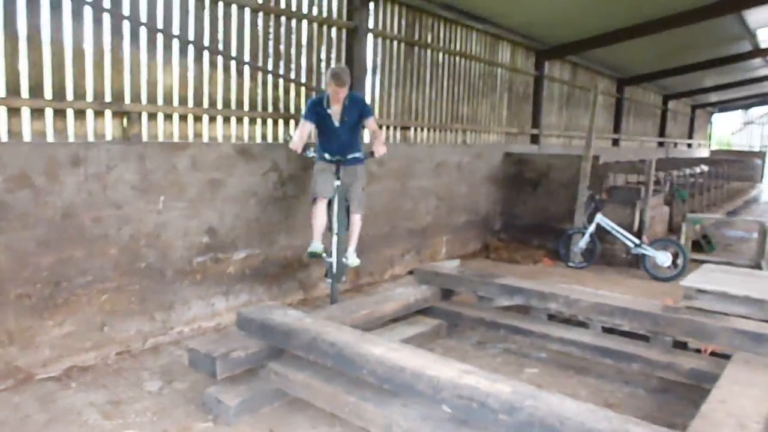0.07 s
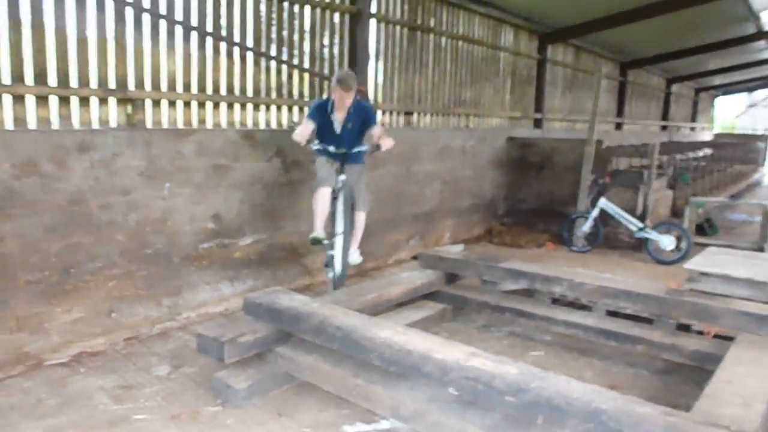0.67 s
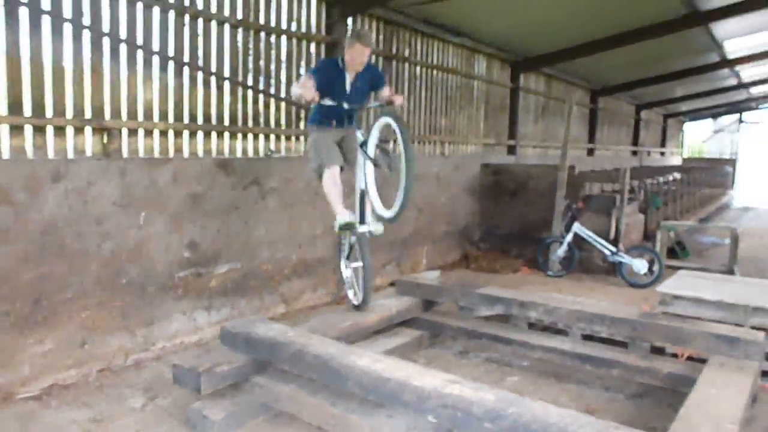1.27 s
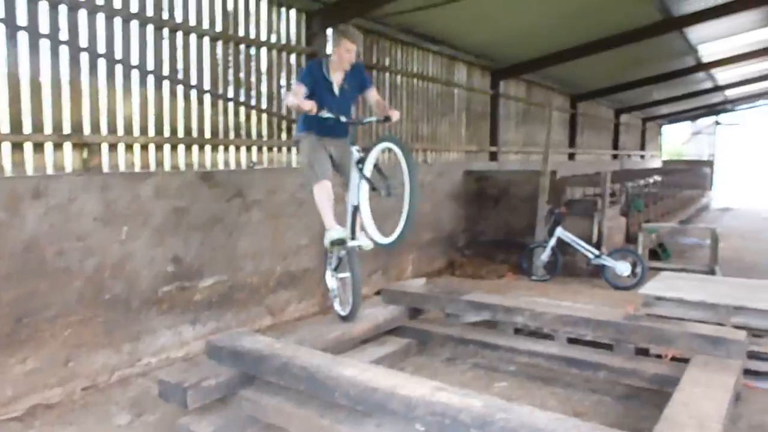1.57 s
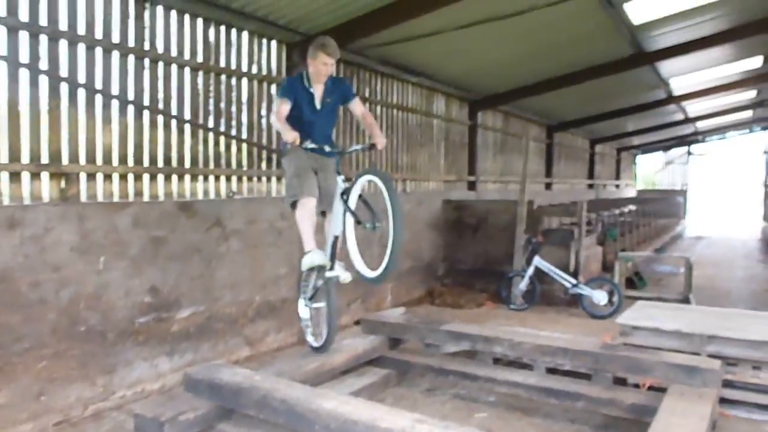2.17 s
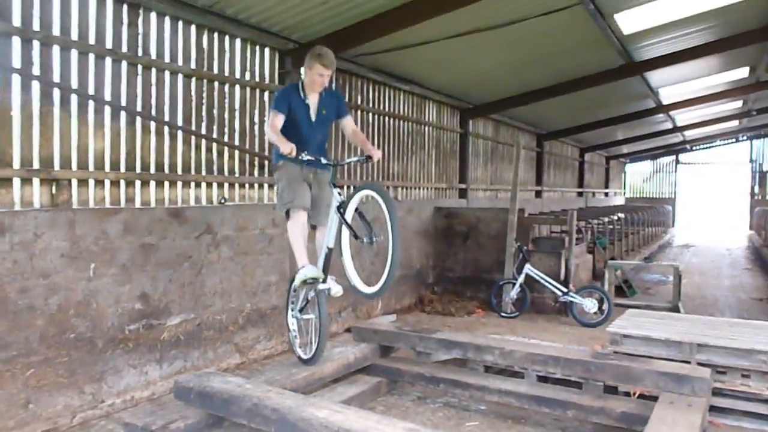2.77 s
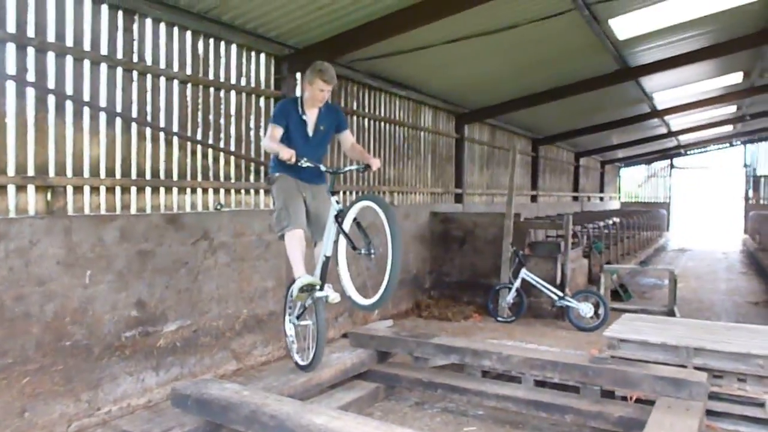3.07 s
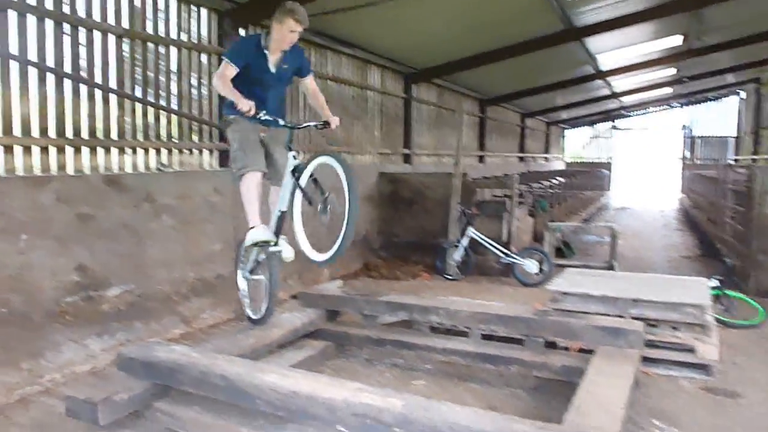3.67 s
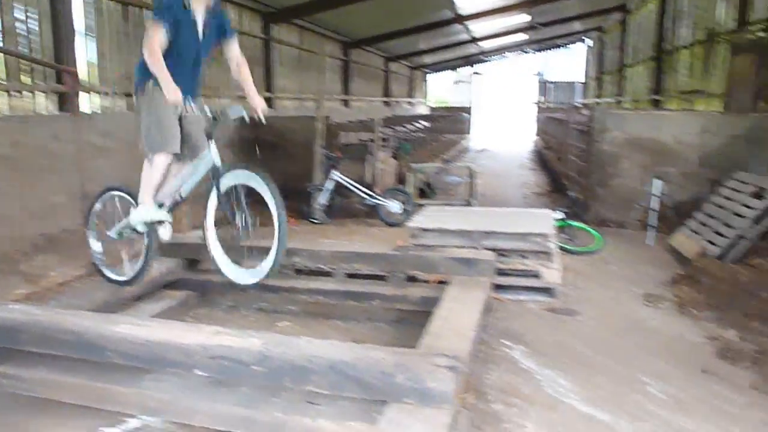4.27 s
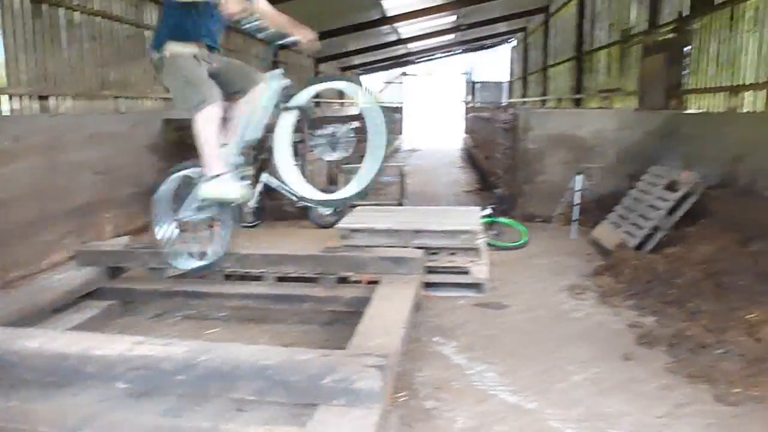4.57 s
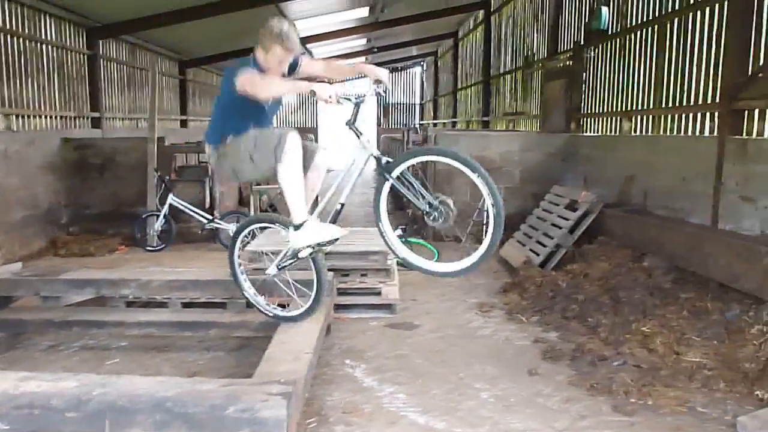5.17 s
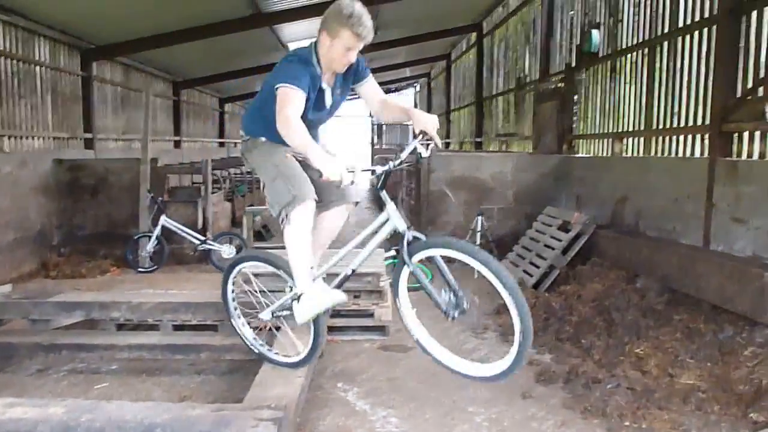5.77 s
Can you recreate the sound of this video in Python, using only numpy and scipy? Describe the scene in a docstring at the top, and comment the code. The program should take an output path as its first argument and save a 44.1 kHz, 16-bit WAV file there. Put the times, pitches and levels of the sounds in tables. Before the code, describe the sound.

A bicycle hops on wooden beams in a large, echoing barn, over a faint steady hush. From about 0.2 to 0.4 seconds the brakes give a loud, stuttering honk that leaves the wheel ringing. The freewheel buzzes briefly, then a second honk with a chain clink comes near 0.9 seconds, followed by another buzz and a sharp, higher squeak at 1.2. From 1.7 to 3.8 seconds it is quieter, with soft, irregular tyre thumps on timber as the ring fades. The chain clinks at 4 seconds, and around 4.5 the freewheel buzzes with tyre scrub and a short low hum. The loudest sound, a very short brake squawk, hits at 4.7 seconds and rings on. At about 5.3 the bike lands with a firm knock, a chain snap and another squeak, then the tyres scrub faintly.

```python
"""A trials bike's brakes honk as it hops along wooden beams in a big barn.
The pads stick and slip, sounding through the frame and setting the wheel ringing.
Between grabs the freewheel buzzes, the chain clinks, and tyres scrub, thump and hum on the timber.
The barn rings on over a steady hush; a limiter ducks the loudest peaks."""
import sys
import numpy as np
from scipy import signal
from scipy.fft import rfft, irfft, next_fast_len
from scipy.io import wavfile
from scipy.ndimage import uniform_filter1d, minimum_filter1d

SR = 44100
rng = np.random.default_rng(int(sys.argv[2]) if len(sys.argv) > 2 else 0)


def persist_wave(psi):
    """Save psi, clipped to +-1, as 16-bit WAV."""
    counts = np.round(np.clip(psi, -1, 1) * 32767).astype(np.int16)
    wavfile.write(sys.argv[1], SR, np.atleast_2d(counts).T)


N = 261513
BAND_EDGE_HZ = 7950


def amp(db):
    """Decibels to gain."""
    return 10 ** (np.asarray(db) / 20)


def unit_rms(x):
    """Scale to rms 1."""
    return x / np.sqrt(np.mean(x ** 2) + 1e-20)


def lookup(curve, hz):
    """Interpolate a table on a log-frequency axis."""
    points_hz, values = np.transpose(curve)
    return np.interp(np.log(hz + 1), np.log(points_hz), values)


def colour(x, curve, tilt_db_per_oct=0):
    """Filter by a gain curve tilted about 1 kHz; cut off just past the band edge."""
    size = next_fast_len(x.shape[-1] + 2048)
    hz = np.fft.rfftfreq(size, 1 / SR)
    octaves = np.log2(np.maximum(hz, 200) / 1000)
    gain = amp(lookup(curve, hz) + tilt_db_per_oct * octaves) * (hz < BAND_EDGE_HZ + 600)
    return irfft(rfft(x, size) * gain, size)[..., :x.shape[-1]]


def wander(shape, span_samples):
    """Smooth random drift, rms 1."""
    drift = uniform_filter1d(rng.standard_normal(shape), span_samples)
    return unit_rms(uniform_filter1d(drift, span_samples))


def grit(samples, spread_db):
    """Dense tiny contacts of uneven size."""
    return unit_rms(rng.standard_normal(samples) * amp(spread_db * wander(samples, span_samples=24)))


def stroke(hold_s, swell_db, attack_s, release_s):
    """Attack, sloping hold, release: returns time, progress 0-1 and gain."""
    t = np.arange(0, hold_s + 7 * release_s, 1 / SR)
    progress = np.minimum(t / hold_s, 1)
    edges = np.minimum(t / attack_s, 1) * np.exp(-np.maximum(t - hold_s, 0) / release_s)
    return t, progress, edges * amp(swell_db * (progress - 0.5))


# Hub response: freq_hz, gain_db
HUB_BODY = [(100, -47.5), (600, -28), (1500, -6.5), (2200, -12.5), (3300, -3), (4200, 0.5), (5200, 4),
            (6400, 0), (7300, -2.5), (8200, -34.5)]
# Spells of rolling: start_s, hold_s, freewheel_db, scrub_db, swell_db
WHEEL_ROLLS = [ (0, 0.089, -46.5, -44, -7), (.51, .21, -41.5, -43, 0), (0.996, .218, -38, -44.5, 10.5),
               (1.841, 0.1, -51, -59, -19), (2.401, 0.034, -46, -59, 8), (3.811, 0.16, -39, -47, 2),
               (4.019, 0.026, -38, -40.5, -11), (4.274, 0.11, -64, -46.5, 15), (4.40, 0.083, -34, -40, 3),
               (4.482, 0.3, -31.5, -34, 0.5), (5.004, 0.062, -41, -41.5, 1.5), (5.227, 0.14, -45, -64, 11),
               (5.663, 0.4, -59.5, -47, 8.5)]


def freewheel(clicks_per_s=330, ring_s=0.008, uneven_db=3):
    """Pawls drop over ratchet teeth so fast that the clicks blur into a buzz."""
    out = np.zeros(N)
    for start_s, hold_s, level_db, _, swell_db in WHEEL_ROLLS:
        t, _, gain = stroke(hold_s, swell_db, attack_s=0.0039, release_s=0.012)
        teeth = np.cumsum(clicks_per_s * (1 + 0.16 * wander(len(t), span_samples=1500))) / SR
        tooth_force = amp(uneven_db * rng.standard_normal(2048))[teeth.astype(int) % 2048]
        since_click_s = (teeth % 1) / clicks_per_s
        clicks = tooth_force * np.exp(-since_click_s / ring_s) * rng.standard_normal(len(t))
        add(out, start_s, amp(level_db) * gain * unit_rms(colour(clicks, HUB_BODY)))
    return out


# Beam response: freq_hz, gain_db
TIMBER_BODY = [(60, -27), (130, -14.5), (250, -2.5), (400, 8), (700, 6.5), (1100, -2), (1700, -3),
               (2700, -6.5), (3600, -13.5), (6000, -18.5), (8000, -35.5)]


def tyre_scrub():
    """Rubber scrubs the wood as the wheels turn."""
    out = np.zeros(N)
    for start_s, hold_s, _, level_db, swell_db in WHEEL_ROLLS:
        t, _, gain = stroke(hold_s, swell_db, attack_s=0.0063, release_s=0.073)
        scrub = colour(grit(len(t), spread_db=4), TIMBER_BODY, tilt_db_per_oct=4)
        add(out, start_s, amp(level_db) * gain * unit_rms(scrub))
    return out


# Diffuse-field width: freq_hz, side_gain_db
STEREO_WIDTH = [(40, 4), (120, -10), (250, -12), (500, -10), (1000, -8.5), (2000, -5), (4000, 0.5),
                (8000, -2.5)]


def diffuse(mid, side):
    """Sound from all round: left and right alike in the low mids, unrelated in the treble."""
    side = colour(side, STEREO_WIDTH)
    return np.array([mid + side, mid - side])


# Background spectrum: freq_hz, gain_db
AIR_SPECTRUM = [(18, -58.5), (30, -40), (76, -63), (158, -11), (209, -15), (283, -4.5), (402, -14),
                (451, -6), (1050, -12.5), (1350, -11), (1520, -16.5), (5630, -25), (8000, -38.5),
                (10400, -74.5), (17600, -120)]


def air(level_db=-52):
    """Steady hush of the open barn."""
    mid, side = colour(rng.standard_normal((2, N)), AIR_SPECTRUM)
    drift_db = 0.5 * wander(N, span_samples=3000)
    return amp(level_db + drift_db) * diffuse(unit_rms(mid), unit_rms(side))


def impact(level_db, decay_s, body, rise_s, tilt_db_per_oct=0):
    """A flurry of contacts swells and dies, coloured by the struck body."""
    t = np.arange(SR // 3) / SR
    contacts = grit(len(t), spread_db=2.5)
    steady_rms = np.sqrt(np.mean(colour(contacts, body, tilt_db_per_oct) ** 2))
    force = np.exp(-t / decay_s) * (1 - np.exp(-t / rise_s))
    return amp(level_db) / steady_rms * colour(contacts * force, body, tilt_db_per_oct)


# Chain response: freq_hz, gain_db
CHAIN_BODY = [(500, -50.5), (1100, 6.5), (1700, 9), (2300, 2.5), (3200, 3.5), (4500, 3), (6000, 8),
              (8000, -9)]
# Drive taking up load: start_s, level_db, decay_s
CHAIN_CLINKS = [(0.028, -36, 0.0031), (0.175, -39.5, 0.029), (0.881, -25, 0.017), (1.805, -35.5, 0.018),
                (2.404, -60, 0.0028), (3.812, -34, 0.0086), (4.004, -24.5, 0.015), (5.235, -37, 0.0066),
                (5.264, -41, 0.0053), (5.311, -40.5, .004), (5.34, -22, 0.0047)]


def chain_clinks():
    """Pawls and chain snap tight."""
    out = np.zeros(N)
    for start_s, level_db, decay_s in CHAIN_CLINKS:
        add(out, start_s, impact(level_db, decay_s, CHAIN_BODY, rise_s=0.0006))
    return out


def stick_slip(pitch_hz, roughness, tilt_db_per_oct, body, jitter, rasp, smear):
    """A train of slips as harmonics through a body; rough slips come unevenly and rasp."""
    slip_hz = pitch_hz * (1 + jitter * roughness * wander(len(pitch_hz), span_samples=70))
    phase = 2 * np.pi * np.cumsum(slip_hz) / SR
    harmonic = np.arange(1, 15)[:, None]
    gains = amp(lookup(body, harmonic * pitch_hz) + tilt_db_per_oct * np.log2(harmonic))
    gains /= np.sqrt((gains ** 2).sum(0) / 2)
    # Slip edges vary, so upper harmonics dissolve into hiss.
    blur_rad = smear * roughness * (harmonic - 1) * wander(gains.shape, span_samples=36)
    offset_rad = rng.uniform(0, 2 * np.pi, harmonic.shape)
    tone = (gains * np.cos(harmonic * phase + blur_rad + offset_rad)).sum(0)
    pulsed_noise = rng.standard_normal(len(phase)) * (1 + np.cos(phase))
    return tone + rasp * roughness * unit_rms(colour(pulsed_noise, body))


# Frame and rim radiation: freq_hz, gain_db
FRAME_BODY = [(100, -42.5), (380, -24.5), (500, 10), (900, -2), (1100, -3), (1500, 6.5), (1850, -6.5),
              (2100, -2.5), (2400, -3), (2750, -8.5), (3400, -12.5), (4500, -18), (6200, -17.5),
              (8000, -42.5)]


def squeal(hold_s, opening_hz, settled_hz, level_db, swell_db, roughness, tilt_db_per_oct):
    """A pad catches, slides onto its note, and grows cleaner and brighter as it bites."""
    attack_s, release_s = 0.0021 + 0.15 * hold_s, 0.003 + 0.1 * hold_s
    settle_s, lock_share, bite_db_per_oct = 0.0079, 0.37, 4.5
    t, progress, gain = stroke(hold_s, swell_db, attack_s, release_s)
    pitch_hz = settled_hz + (opening_hz - settled_hz) * np.exp(-t / settle_s)
    bite = progress ** 4.24
    roughness = roughness * (1 - lock_share * bite)  # slips lock into step
    tilt_db_per_oct = tilt_db_per_oct + bite_db_per_oct * bite
    slips = stick_slip(pitch_hz, roughness, tilt_db_per_oct, FRAME_BODY, jitter=0.17, rasp=0.9, smear=1.9)
    return amp(level_db) * gain * slips


# Pad catches: start_s, hold_s, opening_hz, settled_hz, level_db, swell_db, roughness, tilt_db_per_oct
BRAKE_GRABS = [ (0.215, 0.053, 536.6, 516.7, -15.5, 5.5, 0.16, -8.5),
               (.266, 0.015, 518, 529.3, -24.5, -5, 0.07, 0.5),
               (.297, 0.038, 537.6, 536.4, -25, -7.5, .08, -2),
               (0.341, 0.053, 519.5, 520.1, -20, -3.5, 0.08, -3.5),
               (.825, 0.044, 521.3, 513, -24.5, -5, 0.3, -1.5),
               (.829, 0.046, 749, 723.5, -26.5, -2.5, .3, -14),
               (.877, .012, 725.5, 730, -16.5, -2.5, 0.17, -6),
               (.896, 0.0035, 655, 706, -13, 1, 0.39, -4.5), (.903, .03, 727.6, 726, -29.5, 4, 0.2, 5.5),
               (1.2205, .02, 799.4, 987, -7.5, -12.5, 0.19, -0.5),
               (4.687, .014, 570.5, 544.2, -7, -1, .5, 1), (4.687, .008, 1067, 1308, -3.5, -2, 0.49, -4.5),
               (4.696, .009, 906.7, 955, -0.5, 2, 0.31, -1),
               (5.346, 0.0064, 600, 555, -18.5, 3, 0.19, -0.5),
               (5.347, 0.0041, 1179, 1030, -13.5, -6, 0.21, -9),
               (5.362, .045, 553, 532.3, -25.5, -4, 0.54, 4),
               (5.69, 0.12, 522, 509.4, -44.5, -10, 0.4, -29)]
# Braked wheel modes: freq_hz, gain_db, t60_s
WHEEL_MODES = [(545.6, 8, 2.2), (666, 7.5, 4), (1204, -2.5, 0.11), (1487, -3.5, 0.04), (1690, -4, 0.033),
               (1855, -9, 1.2)]


def brakes(low_cut_hz=360):
    """Pads honk through the frame; the wheel rings on."""
    honk = np.zeros(N)
    for start_s, *grab in BRAKE_GRABS:
        add(honk, start_s, squeal(*grab))
    # Thin tubes and rims radiate no bass.
    honk = signal.sosfilt(signal.butter(4, low_cut_hz, "highpass", fs=SR, output="sos"), honk)
    out = honk.copy()
    for freq_hz, gain_db, t60_s in WHEEL_MODES:
        radius = np.exp(-np.log(1000) / (t60_s * SR))
        pole = radius * np.exp(2j * np.pi * freq_hz / SR)
        out += 2 * amp(gain_db) * signal.lfilter([1 - radius], [1, -pole], honk + 1e-12).real
    return out


# Landings: start_s, level_db, decay_s, tilt_db_per_oct
LANDINGS = [(1.724, -34.5, 0.016, 1), (1.757, -36, 0.023, 3), (2.134, -40, 0.0049, 0),
            (2.202, -31.5, 0.028, 2.5), (2.277, -37.5, 0.0072, 10.5), (2.622, -44, 0.019, 3.5),
            (2.696, -36.5, 0.028, 3), (3.032, -48, 0.033, 2), (3.453, -37.5, 0.029, 3.5),
            (3.595, -36.5, 0.0076, -1), (3.748, -40.5, 0.036, 4.5), (4.192, -35.5, 0.052, 2),
            (4.376, -32, 0.018, -1), (5.337, -16.5, 0.0049, 6), (5.345, -19.5, 0.013, 2.5),
            (5.375, -21.5, 0.012, 6.5)]


def tyre_thumps(rise_s=0.0034):
    """Soft tyres land on the beams under the rider's weight."""
    out = np.zeros(N)
    for start_s, level_db, decay_s, tilt_db_per_oct in LANDINGS:
        add(out, start_s, impact(level_db, decay_s, TIMBER_BODY, rise_s, tilt_db_per_oct))
    return out


# Tyre response: freq_hz, gain_db
TYRE_BODY = [(150, -22.5), (250, 3.5), (480, 3.5), (720, -14.5), (1000, -9), (1500, -31.5), (4000, -22)]


def tread_hum(start_s=4.476, level_db=-34.5, opening_hz=256.4, sag_hz_per_s=540):
    """Tread blocks drum at take-off; the pitch sags as the wheel slows."""
    out = np.zeros(N)
    t, _, gain = stroke(hold_s=0.115, swell_db=-11, attack_s=0.0056, release_s=0.02)
    hum = stick_slip(opening_hz - sag_hz_per_s * t, roughness=0.3, tilt_db_per_oct=5,
                     body=TYRE_BODY, jitter=0.073, rasp=0.94, smear=0.08)
    add(out, start_s, amp(level_db) * gain * hum)
    return out


# Reverb decay: freq_hz, t60_s
BARN_DECAY = [(100, 1.5), (300, 0.79), (600, 1.296), (1000, 0.83), (1900, 0.87), (3000, 0.76), (5000, 0.75),
              (8000, 0.51)]
# Echo strength: freq_hz, gain_db
BARN_RESPONSE = [(100, 7.5), (330, -1.5), (510, -12), (720, -9), (900, -4), (1800, 0), (3000, -3.5),
                 (5000, -4.5), (8000, -2.5)]


def barn_echo(x, early_db=-5, early_t60_s=0.11, build_s=0.0032, echoes_per_s=3000):
    """Quick echoes off floor and wall, then the barn's long ring."""
    t = np.arange(3 * SR // 2) / SR
    signs = rng.choice([-1.0, 1.0], (2, len(t)))
    taps = signs * (rng.random(signs.shape) < echoes_per_s / SR)
    hz, frame_s, spectra = signal.stft(taps, SR, nperseg=512)
    decay = amp(-60 * frame_s / lookup(BARN_DECAY, hz)[:, None])
    _, tail = signal.istft(spectra * decay, SR, nperseg=512)
    tail = tail[:, :len(t)] * (1 - np.exp(-t / build_s))
    early = taps[:, ::-1] * amp(-60 * t / early_t60_s) * (t > 0.002)
    echoes = tail / np.linalg.norm(tail[0]) + amp(early_db) * early / np.linalg.norm(early[0])
    mid, side = colour(echoes, BARN_RESPONSE)
    return signal.fftconvolve(x[None], diffuse(mid, side), axes=1)[:, :N]


def add(mix, start_s, sound):
    """Mix a sound in at start_s."""
    part = mix[round(start_s * SR):][:len(sound)]
    part += sound[:len(part)]


# Stereo balance: freq_hz, left_over_right_db
STEREO_BALANCE = [(500, -0.7), (1000, -1), (2000, 0.5), (4500, 2.5), (8000, 1)]


def scene():
    """The bike in the barn, its treble a little to the left."""
    bike = brakes() + freewheel() + tyre_thumps() + chain_clinks() + tyre_scrub() + tread_hum()
    left, right = bike + barn_echo(bike)
    left_curve = np.array(STEREO_BALANCE) * [1, 0.5]
    right_curve = left_curve * [1, -1]
    return np.array([colour(left, left_curve), colour(right, right_curve)]) + air()


def record(dry, ceiling_db=-2.2, recover_db_per_s=36):
    """Look-ahead limiter with slow recovery, then a low-pass at the band edge."""
    over_db = np.maximum(20 * np.log10(abs(dry).max(0) + 1e-9) - ceiling_db, 0)
    recovery_db = recover_db_per_s * np.arange(N) / SR
    cut_db = np.maximum.accumulate(over_db + recovery_db) - recovery_db
    gain_db = uniform_filter1d(minimum_filter1d(-cut_db, size=200), size=200)
    lowpass = signal.firwin(301, BAND_EDGE_HZ, window=("kaiser", 8), fs=SR)
    return signal.oaconvolve(dry * amp(gain_db), lowpass[None], "same")


dry = scene()
out = record(dry)
persist_wave(out)
```